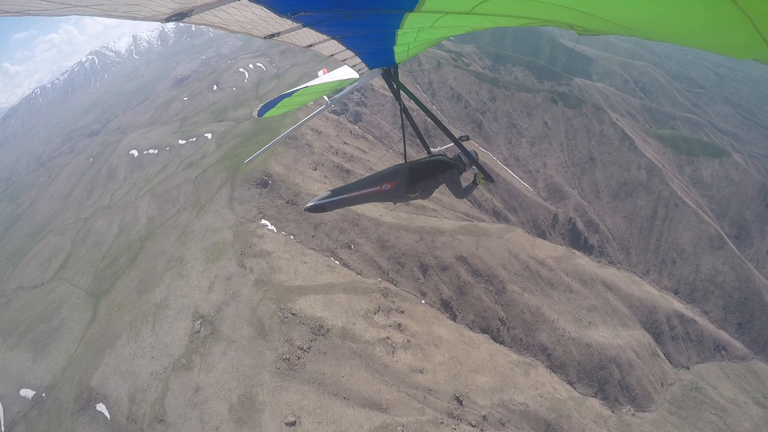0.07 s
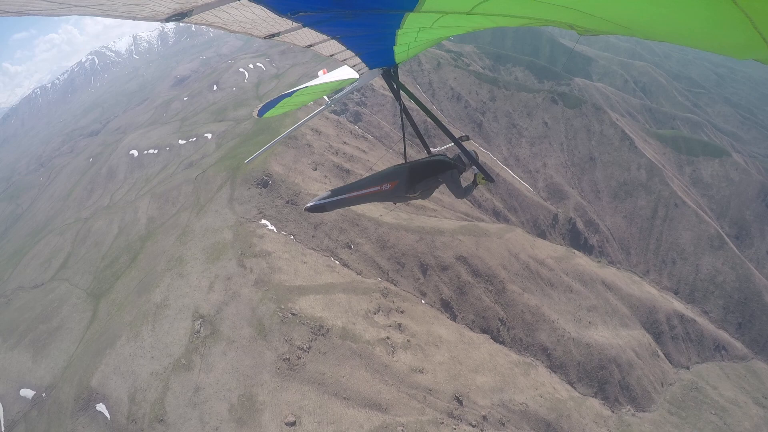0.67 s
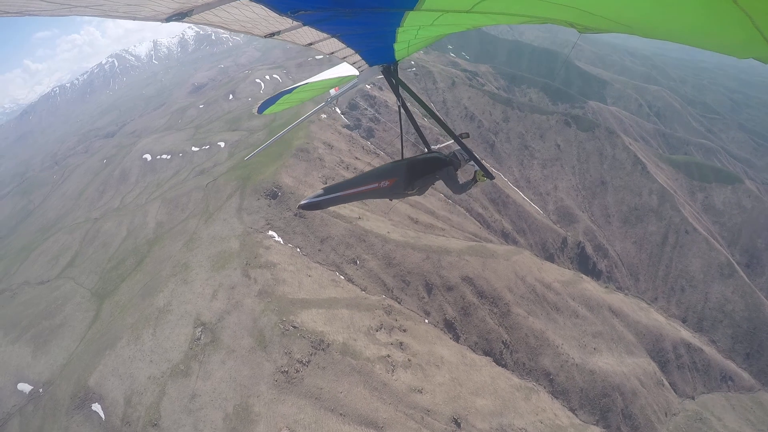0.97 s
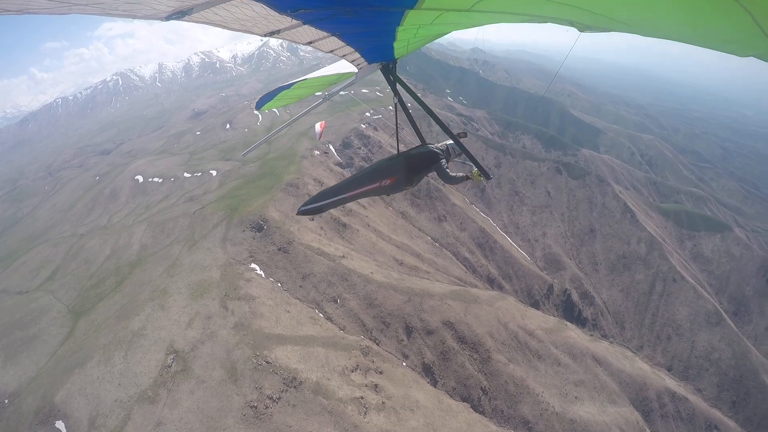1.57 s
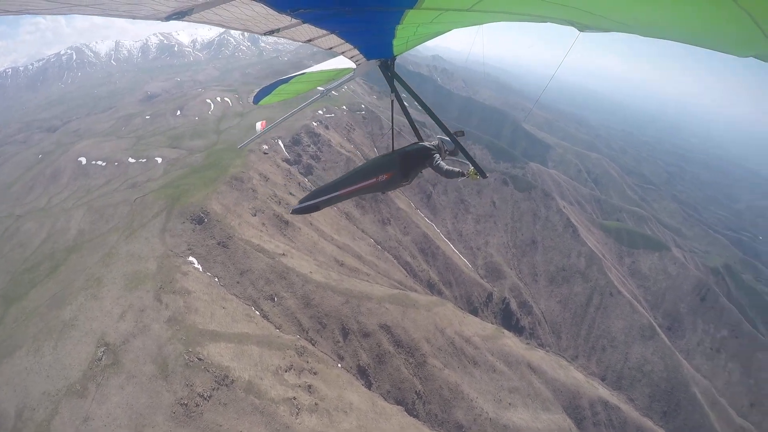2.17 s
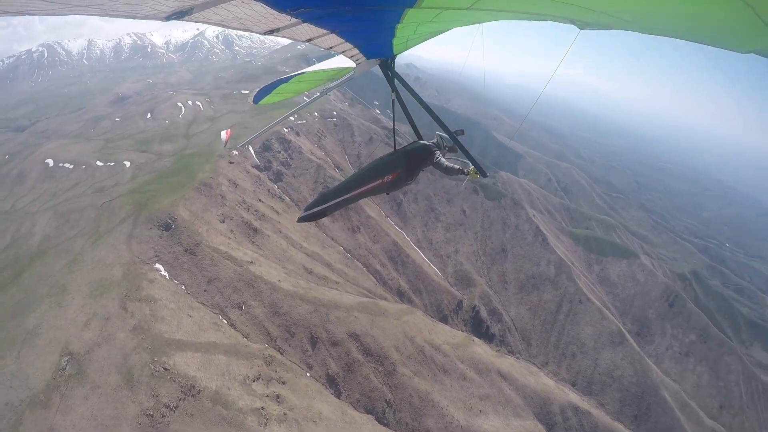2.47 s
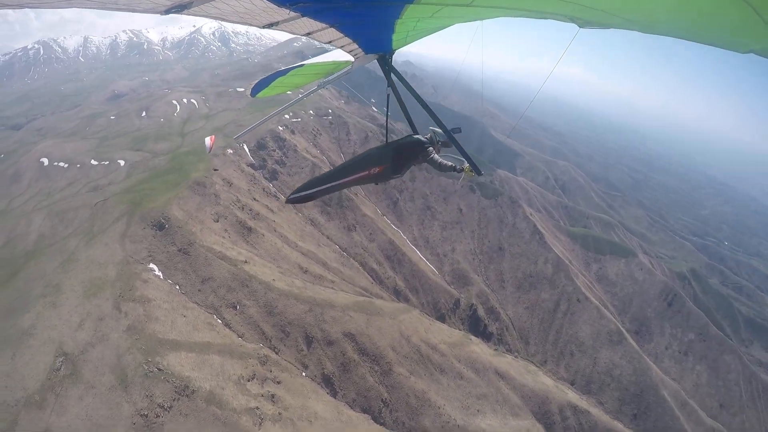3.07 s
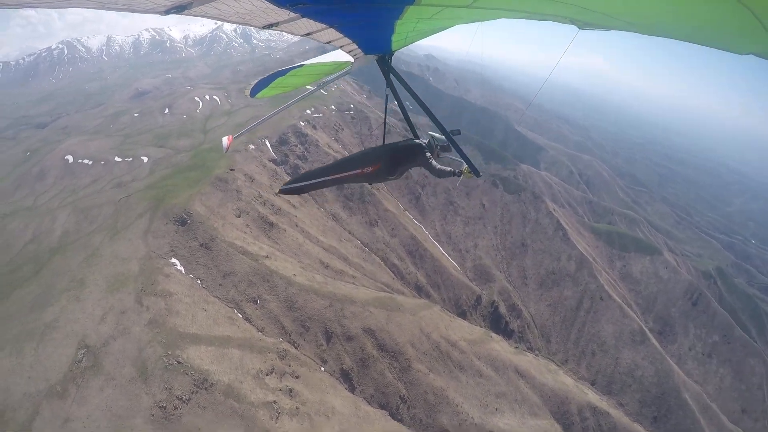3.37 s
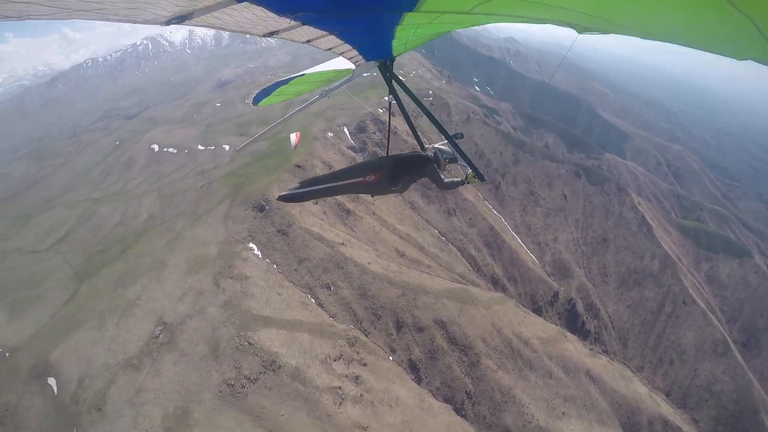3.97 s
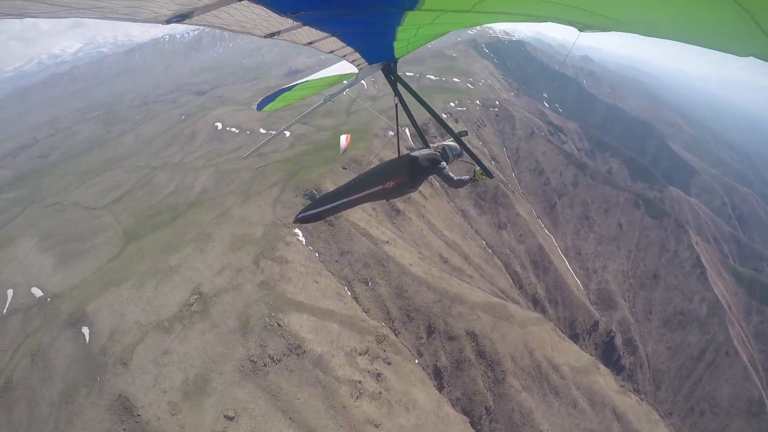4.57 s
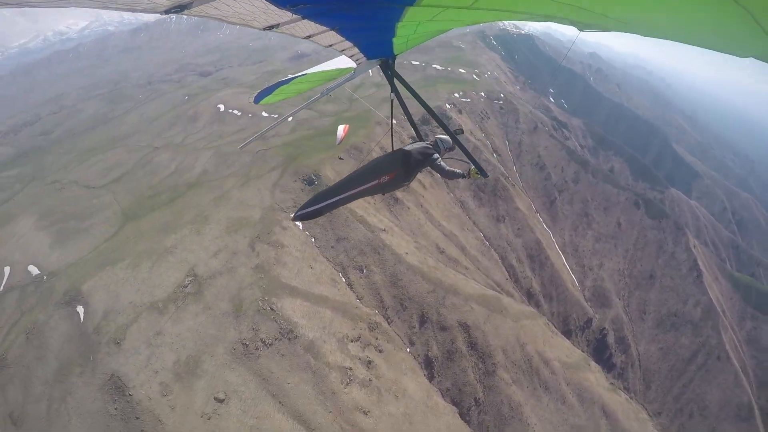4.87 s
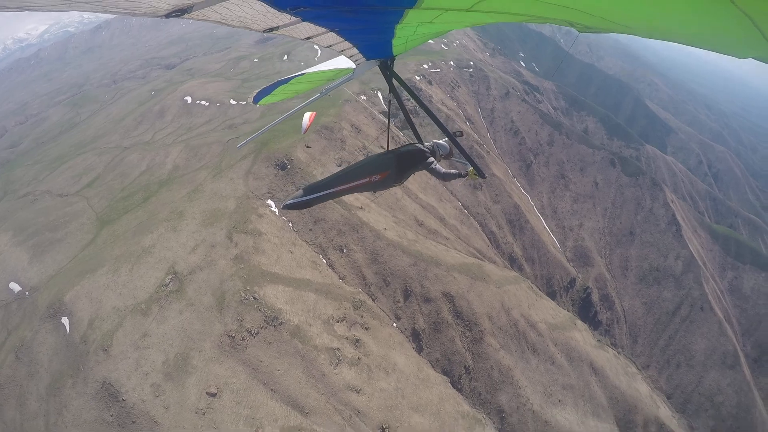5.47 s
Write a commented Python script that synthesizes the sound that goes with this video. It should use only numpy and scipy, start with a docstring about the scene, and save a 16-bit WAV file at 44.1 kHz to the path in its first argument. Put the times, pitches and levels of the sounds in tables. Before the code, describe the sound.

Air rushes past a flying hang glider, hissing and thumping against the microphone over a deep wind rumble.

```python
"""Wind on a hang glider

Air rushes over a camera fixed to the wing, high in open air with no echo.
Eddies (small swirls of air) shake its housing into a low rumble, while the airstream
hisses through the gaps and rings small hollows. The flow is ragged at first, then smooth;
a gust thumps past and the hiss sinks before it picks up again."""
import sys
import numpy as np
from scipy import signal
from scipy.fft import rfft, irfft
from scipy.io import wavfile
from scipy.ndimage import uniform_filter1d

SR = 44100
rng = np.random.default_rng(int(sys.argv[2]) if len(sys.argv) > 2 else 0)


def dump_mix(stems):
    """Bounce the given channels to the path in sys.argv[1] as a 16-bit WAV at rate SR."""
    frames = np.atleast_2d(stems).T  # one column per channel
    limited = np.clip(frames, -1, 1)  # hard clip at full scale
    pcm = np.round(limited * 32767).astype(np.int16)
    wavfile.write(sys.argv[1], SR, pcm)


N = 247401
TIME = np.arange(N) / SR
FREQ = np.maximum(np.fft.rfftfreq(N, 1 / SR), 1)
CRUISE_HISS_DB, CRUISE_RUMBLE_DB, CRUISE_ROAR_DB = -30, -25, -50  # levels in steady flight

# rough air at the camera mount: t/s, rumble level/dB, roar level/dB
ROUGH_AIR = [(0.09, -21.5, -40), (0.7, -18, -40.5), (1.3, -21.3, -44.5), (1.6, -22.3, -43),
             (1.95, -27, -45), (2.2, -28, -53), (2.75, -29, -57), (3.2, -27, -58), (3.48, -33.5, -54.5),
             (3.8, -25.5, -53), (4.2, -27.5, -46.5), (4.38, -23, -45.5), (4.75, -24.5, -50.5),
             (5.15, -28.5, -47.5), (5.6, -30.8, -50)]
# single eddies that thump the housing: t/s, rumble boost/dB
EDDY_THUMPS = [(0.129, 6), (0.26, 2), (0.451, 6), (0.71, 3), (0.901, 4.5), (1.13, 7), (1.41, 5), (1.559, 7),
               (1.73, 5), (1.988, 10), (2.48, 9.5), (2.7, 7.5), (2.77, 8), (2.88, 8), (3.02, 1),
               (4.08, 4.5), (4.33, 5), (4.63, 9), (4.83, -1), (4.91, 2)]
# gusts rolling by: start t/s, level/dB
GUST_SWELLS = [(0.17, -22), (0.69, -25), (2.98, -23.5), (3.85, -26), (4.29, -15)]
# hiss of air over the housing: t/s, level/dB
HISS_LEVELS = [(0.09, -28), (0.4, -29.5), (0.7, -31), (0.8, -29), (1.08, -34), (1.55, -31.5), (1.9, -30.5),
               (2.1, -32.5), (2.48, -30.8), (3.56, -30.5), (3.63, -28), (4.08, -29), (4.29, -40.5),
               (4.37, -38.5), (4.56, -45), (4.86, -46.5), (4.96, -41), (5.33, -39.3), (5.5, -33.4)]

# tone of the low rumble: f/Hz, level/dB
RUMBLE_TONE = [(10, -20), (28, -19), (42, -1.5), (65, -.5), (95, -0.5), (120, 0), (132, -9.5), (150, -17.5),
               (200, -31.5), (400, -54)]
# tone of the even deeper pressure swells: f/Hz, level/dB
SWELL_TONE = [(5, -28), (11, 1), (17, 7), (25, -3.5), (40, -4.5), (80, -25), (200, -65)]
# tone of the hiss: f/Hz, level/dB
HISS_TONE = [(200, -26.5), (850, -15.5), (1080, -10), (2050, -8), (2380, -9.5), (2700, -2), (3300, -2),
             (4300, -10), (4650, -21.5), (5150, -25.5), (6200, -25), (7400, -38), (8000, -43.5),
             (15000, -54)]
# tone of the roar behind the housing: f/Hz, level/dB
ROAR_TONE = [(100, -8.5), (170, 3), (290, -5.5), (350, -10.5), (480, -12), (650, -15.5), (820, -11.5),
             (1300, -13.5), (1550, -2.5), (1680, -16), (2300, -15.5), (2750, -0.5), (4000, -32),
             (5000, -38)]
# tone of the thin, high sizzle: f/Hz, level/dB
SIZZLE_TONE = [(3000, -3), (5000, 5.5), (7200, 9), (8400, 1.5), (8800, -2), (10200, -7), (11500, -13),
               (15000, -23)]
# small hollows in the housing: f/Hz, width/Hz, boost or dip/dB
HOLLOWS = [(2634, 316, 5), (2868, 160, 3), (3280, 130, 5), (3794, 480, 3.5), (4900, 220, 7),
           (5120, 160, -3.5), (5540, 380, 5.5), (6250, 190, 1.5), (6680, 260, -9), (6930, 310, 12),
           (11100, 600, 4.5)]
# breathy notes of air crossing edges: f/Hz, width/Hz, level/dB
EDGE_NOTES = [(1290, 25, -6), (1560, 126, -6.5), (1826, 160, -1), (2066, 126, -3.5)]


def buffeting(rumble_db):
    """Eddies push on the housing and make it rumble; gusts add slow swells of pressure."""
    muffle = 1 / (1 + (FREQ / 900) ** 4)
    rumble = air_noise(tone(RUMBLE_TONE) * muffle, flutter_db=0, band_hz=(45, 150))
    swell = air_noise(tone(SWELL_TONE) * muffle, flutter_db=0, band_hz=(10, 40))
    pressure = even_out(rumble, span_s=0.12) * undb(rumble_db)
    pressure += even_out(swell, span_s=0.15) * gusts()
    ceiling = 0.81  # the strongest pushes round off toward this
    return ceiling * np.tanh(pressure / ceiling)


def thumps():
    """Each eddy that hits the housing gives a brief boost, in dB."""
    half_length_s = 0.017
    return sum(db * np.exp(-((TIME - t) / half_length_s) ** 2) for t, db in EDDY_THUMPS)


def gusts():
    """Strength of the swell over time: each gust builds fast and dies away slowly."""
    rise_s, decay_s, calm_db = 0.052, 0.18, -33
    power = undb(calm_db) ** 2
    for start, db in GUST_SWELLS:
        age = TIME - start
        rise = np.clip(age / rise_s, 0, 1)
        fall = np.exp(-np.maximum(age - rise_s, 0) / decay_s)
        power += (undb(db) * rise * fall) ** 2
    return np.sqrt(power)


def airstream(eddies, hiss_db, roar_db):
    """Rushing air hisses, flutters with the eddies and rings the housing's hollows and edges."""
    flutter_db = 0.79 * eddies + 0.24 * wander(rate_hz=140)
    hollows_db = sum(db * resonance(hz, width) for hz, width, db in HOLLOWS)
    hiss = air_noise(tone(HISS_TONE) * undb(hollows_db), flutter_db, band_hz=(2400, 4500))
    ringing = sum(undb(db) * resonance(hz, width) for hz, width, db in EDGE_NOTES)
    edges = air_noise(ringing, flutter_db, band_hz=(1700, 2200))
    # the edges sing best in fast, smooth air
    edge_db = -40.5 + 0.73 * (hiss_db - CRUISE_HISS_DB) - 0.25 * (roar_db - CRUISE_ROAR_DB)
    return hiss * undb(hiss_db) + edges * undb(edge_db)


def wake(eddies, hiss_db, rumble_db, roar_db):
    """Air breaks away behind the housing with a hollow roar and a thin, high sizzle."""
    flutter_db = 0.71 * eddies + 0.96 * wander(rate_hz=78)
    muffle = 1 / (1 + (FREQ / 6500) ** 6)
    mount_note = undb(3.5 * resonance(hz=291, width_hz=31))
    roar = air_noise(tone(ROAR_TONE) * mount_note * muffle, flutter_db, band_hz=(170, 500))
    sizzle = air_noise(tone(SIZZLE_TONE), flutter_db, band_hz=(7600, 12000))
    # faster, rougher air sizzles more
    sizzle_db = (-68.5 + 0.44 * (hiss_db - CRUISE_HISS_DB)
                 + 0.95 * (rumble_db - CRUISE_RUMBLE_DB)
                 + 0.39 * (roar_db - CRUISE_ROAR_DB))
    return roar * undb(roar_db) + sizzle * undb(sizzle_db)


def tick():
    """One faint, bright tick near the end, over in less than a millisecond."""
    start_s, level_db, decay_s = 5.4232, -32.5, 0.00012
    age = np.maximum(TIME - start_s, 0)
    return undb(level_db) * (age > 0) * np.exp(-age / decay_s) * rng.standard_normal(N)


def air_noise(gains, flutter_db, band_hz):
    """Swirling air as noise shaped by gains, scaled so the part inside the band has strength 1."""
    spectrum = rfft(rng.standard_normal(N) * undb(flutter_db)) * gains
    inside = (FREQ > band_hz[0]) & (FREQ < band_hz[1])
    return irfft(spectrum, N) / irfft(spectrum * inside, N).std()


def wander(rate_hz):
    """A smooth random wobble of typical size 1 that changes about rate_hz times a second."""
    smoothing = (FREQ > 2) / (1 + (FREQ / rate_hz) ** 2)
    wobble = irfft(rfft(rng.standard_normal(N)) * smoothing, N)
    return wobble / wobble.std()


def even_out(noise, span_s):
    """Keep the single eddies but give each stretch of them the same strength."""
    size = int(span_s * SR / 2)
    power = uniform_filter1d(uniform_filter1d(noise ** 2, size), size)
    return noise / np.sqrt(power + 1e-9)


def resonance(hz, width_hz):
    """How strongly something rings at each frequency: 1 at its own note, less to either side."""
    off_pitch = (FREQ ** 2 - hz ** 2) / (FREQ * width_hz)
    return 1 / (1 + off_pitch ** 2)


def tone(table):
    """Turn a tone table into a gain for every frequency."""
    hz, db = np.transpose(table)
    return undb(np.interp(np.log(FREQ), np.log(hz), db))


def curves(table):
    """Join the points of each level column with straight lines in time."""
    times, *columns = np.transpose(table)
    return [np.interp(TIME, times, column) for column in columns]


def undb(db):
    """Turn decibels into a gain, the number a signal is multiplied by."""
    return 10 ** (np.asarray(db) / 20)


def scene():
    """The speed and roughness of the air drive the wind sounds, which meet at one microphone."""
    hiss_db, = curves(HISS_LEVELS)
    rumble_db, roar_db = curves(ROUGH_AIR)
    eddies, thump_db = wander(rate_hz=22), thumps()
    sound = buffeting(rumble_db + thump_db)
    sound += airstream(eddies, hiss_db, roar_db)
    sound += wake(eddies, hiss_db, rumble_db, roar_db + 0.14 * thump_db)
    return (sound + tick())[None]


def record(dry):
    """The microphone adds its own hiss, the sound fades in, and the camera cuts the highest treble."""
    mic_hiss_db, start_s, fade_s, top_hz = -72.5, 0.073, 0.017, 15000
    sound = dry + undb(mic_hiss_db) * rng.standard_normal(N)
    fade_in = np.clip((TIME - start_s) / fade_s, 0, 1)
    treble_cut = signal.ellip(8, 0.2, 70, top_hz, fs=SR, output="sos")
    return signal.sosfilt(treble_cut, sound * fade_in)


dry = scene()
out = record(dry)
dump_mix(out)
```